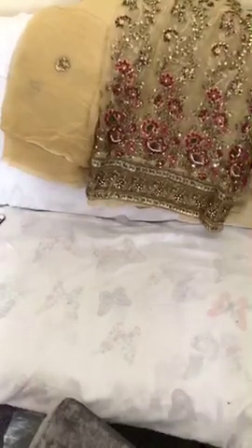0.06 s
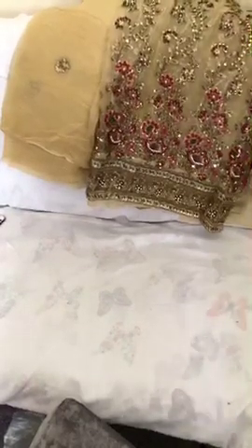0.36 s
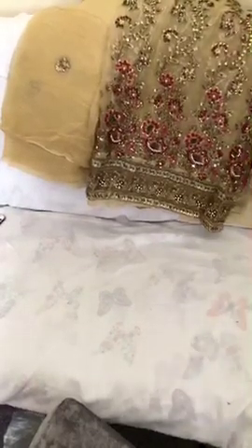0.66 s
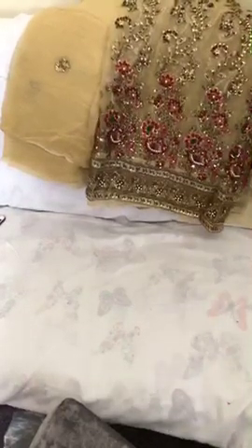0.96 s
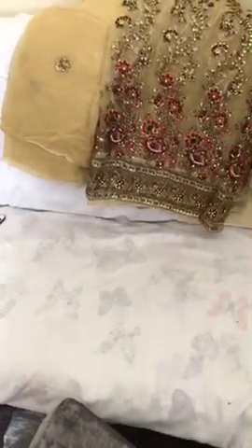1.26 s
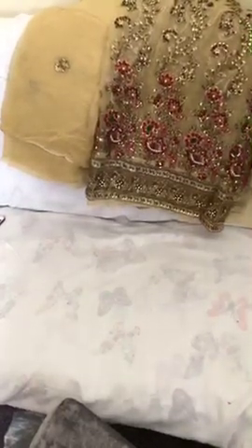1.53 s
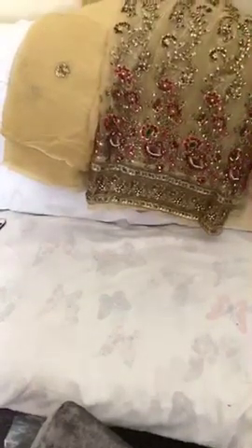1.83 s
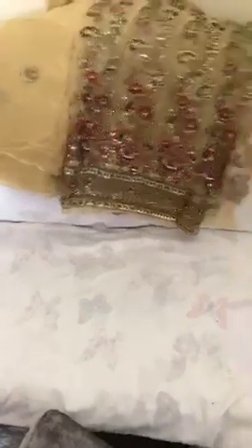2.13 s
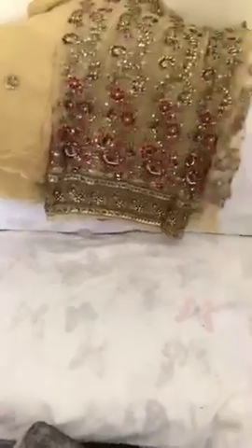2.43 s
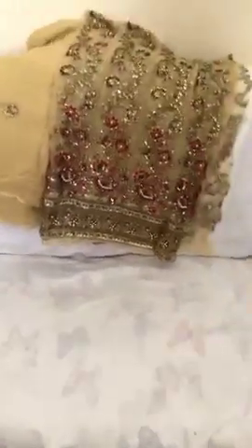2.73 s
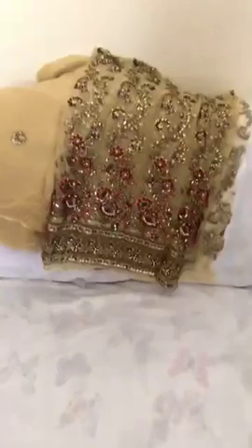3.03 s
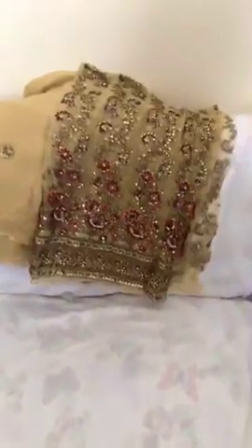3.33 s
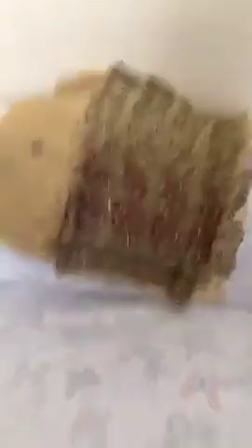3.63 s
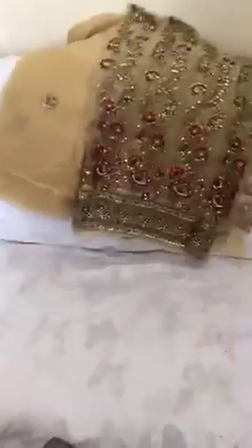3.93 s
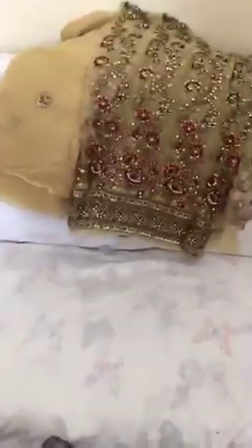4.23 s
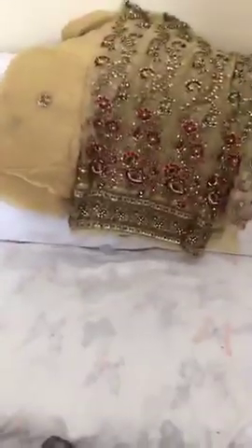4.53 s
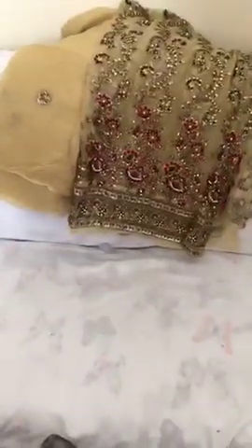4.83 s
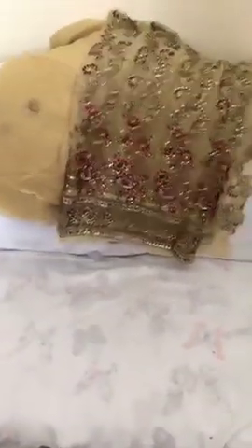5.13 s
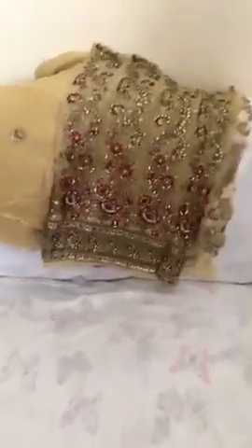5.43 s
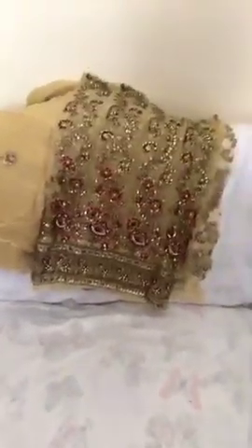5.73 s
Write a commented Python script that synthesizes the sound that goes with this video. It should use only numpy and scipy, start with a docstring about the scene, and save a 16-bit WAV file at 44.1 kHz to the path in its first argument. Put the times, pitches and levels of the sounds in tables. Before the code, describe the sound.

Stiff beaded fabric crinkles and rustles as it is pulled over a bed, dying away into scattered clicks and soft bumps.

```python
"""A small bedroom, a hand-held microphone near the bed. A stiff, bead-embroidered garment is dragged
over the sheet and spread out. One pull that dies away drives a dense crinkle of catching embroidery
and a soft swish of cloth; as it slows, single beads and creases snap and folds brush past.
Fingers and folds bump dully, and later the fingers slide on the microphone's case.
Behind it all are the room's short tail and a steady hush."""
import sys
import numpy as np
from scipy import signal
from scipy.fft import rfft, irfft, next_fast_len
from scipy.io import wavfile

SR = 44100
rng = np.random.default_rng(int(sys.argv[2]) if len(sys.argv) > 2 else 0)


def dump(signal):
    """Clip the signal to [-1, 1] and save it as 16-bit WAV at the path in sys.argv[1]."""
    limited = np.clip(np.atleast_2d(signal).T, -1, 1)
    pcm = np.round(limited * 32767).astype(np.int16)
    wavfile.write(sys.argv[1], SR, pcm)


N = 263255

FULL_DRAG_DB = -38
REST_S, SETTLE_S = 3.1, 0.21  # the garment lies in place at REST_S, after a short fade

# How hard the garment is pulled over the bed, as the level of its crinkle: time_s, level_db
PULL = [(0.0, -41.5), (0.128, -37.5), (0.41, -38.5), (0.542, -46.5), (0.65, -46), (0.78, -55.5),
        (1.02, -61), (1.12, -55.5), (1.26, -52.5), (1.41, -67), (1.53, -53), (1.74, -71), (1.85, -58.5),
        (1.99, -73), (2.15, -63), (2.29, -73), (2.46, -63), (2.73, -74), (2.86, -73.5), (3.0, -72)]
def pull():
    """One pull that dies away in surges; its level in dB at every sample."""
    return np.interp(np.arange(N) / SR, *np.transpose(PULL))


# Tone of the embroidery at the microphone: frequency_hz, level_db
EMBROIDERY_SPECTRUM = [(290, -46), (500, -3.5), (750, 3), (1100, 0.5), (1700, -2), (2600, -2.5), (4700, -3),
                       (9000, -0.5), (14500, -3), (16000, -13)]
def crinkle(drag_db):
    """Metal thread and beads catch on each other; a slower drag gives fewer catches and less treble."""
    effort_db = drag_db - FULL_DRAG_DB
    catches_per_s = 900 + 4500 * from_db(0.85 * effort_db)
    shared = slips(catches_per_s, spread_db=3, clump_db=4.5)
    coarse = colour(shared + 0.85 * slips(catches_per_s, spread_db=4, clump_db=1.5), EMBROIDERY_SPECTRUM)
    fine = colour(shared + 2 * slips(catches_per_s, spread_db=4, clump_db=3.5), EMBROIDERY_SPECTRUM)
    coarse = rms_one(cut(cut(coarse, 5150, "low", order=4), 860, "high"))
    fine = rms_one(cut(fine, 4870, "high", order=4))
    treble_db = -38.5 + 1.265 * effort_db
    moving = np.clip((drag_db + 75) / 6, 0, 1)  # fades as the cloth comes to a stop
    return moving * (coarse * from_db(drag_db) + fine * from_db(treble_db))


# Tone of cloth on the sheet: frequency_hz, level_db
SWISH_SPECTRUM = [(20, -28), (40, -15), (80, -6), (220, 5.5), (400, 6), (800, 0.5), (1200, -21),
                  (2000, -11), (3000, -71)]
def swish(drag_db):
    """Cloth rubs softly on the sheet, rising and falling with the pull."""
    grains = slips(6000, spread_db=3, clump_db=4.5)
    level_db = -45 + 0.79 * (drag_db - FULL_DRAG_DB)
    return colour(grains, SWISH_SPECTRUM) * from_db(level_db)


# Beads and creases letting go; the metal's glint is relative to the level, slack runs from 0 (taut) to 1:
# start_s, level_db, centre_hz, glint_db, slack
BEAD_SNAPS = [(0.042, -21.5, 3180, -24, 0.64), (0.1148, -25, 6200, 0, 1), (0.1609, -22, 3900, -1, .85),
              (0.2784, -16.5, 3720, -4.5, 0.62), (0.3215, -20.5, 3250, -5, 0.66),
              (0.3695, -22, 7530, -3, 0), (0.4444, -20, 6500, -8, 0.4), (0.6145, -32, 1460, -3, 1),
              (0.6788, -43, 4530, -12, .95), (0.831, -24, 1400, -19, 0.5), (0.8775, -34, 5410, -12, 0),
              (0.9153, -34.5, 4230, -18, 0.99), (0.9607, -31, 5560, -14, .8),
              (0.9648, -28.5, 7800, -12, .05), (1.0133, -31.5, 1200, -26, 0.43),
              (1.0628, -29, 4400, -8, 0.66), (1.0939, -23, 1870, -35, 0.52),
              (1.1355, -32.5, 4100, -10, 0.8), (1.1958, -25.5, 6000, -11, 0), (1.2326, -26.5, 6700, -19, 0),
              (1.281, -30, 2040, -38, .3), (1.3104, -30.5, 3500, -24, 0.6), (1.3709, -34, 5170, -13, 0.64),
              (1.4022, -33, 4080, -30, 0.35), (1.4453, -22, 7800, -10, 0), (1.483, -29, 3420, -6, 0.92),
              (1.4977, -23.5, 3120, -8, 0.3), (1.5291, -28, 1630, -33, 0), (1.5718, -30, 1840, -10, 0.68),
              (1.599, -31.5, 1790, -32, 0.2), (1.6528, -40, 1250, -7, 0.9),
              (1.6728, -31.5, 4500, -35, 0.38), (1.7056, -29.5, 3700, -16, .3),
              (1.71, -25.5, 4070, -22, 0.14), (1.7659, -37.5, 2400, -21, 0.4),
              (1.7849, -27, 3630, -6.5, 0.3), (1.829, -32.5, 3400, -3.5, 0.3),
              (1.8603, -33.5, 2850, 2, 0.74), (1.928, -34.5, 2370, -24, 0.27),
              (1.9988, -40, 1760, -32, 0.2), (2.0413, -41.5, 2020, -14, 0.88),
              (2.1606, -35.5, 2580, -24, 0.6), (2.2468, -47, 2930, -23, 0.6),
              (2.3334, -45.5, 1710, -32, 0.5), (2.4598, -39, 1280, -7, 0.78), (2.588, -39, 1810, -27, 0.66),
              (2.798, -41.5, 3600, -9, 0.64), (2.824, -38, 5200, -2.5, 0.75),
              (2.8985, -41.5, 2260, -13, 0.58), (3.027, -41, 4900, 0, 0.68), (3.086, -38, 6360, -8, 0.61),
              (3.267, -44.5, 4500, 2.5, 0.92), (3.717, -29, 3900, -35, 0.46),
              (4.0583, -45.5, 2000, -15, 0.63), (4.1648, -45, 1850, -9, 0.76),
              (4.7389, -53.5, 2200, -28, 0.94), (5.7636, -46.5, 3220, -45, 0.5),
              (5.7905, -49, 2400, -40, 0.3), (5.9173, -42, 5050, -5, 0.53)]
def snaps(rows):
    """A bead or crease cracks, glints and flaps; returns the direct sound and what enters the room."""
    direct, spread, t = np.zeros(N), np.zeros(N), np.arange(4096) / SR
    click = cut(signal.unit_impulse(len(t)), 590, "high")
    glint_hz = 8800
    for start_s, level_db, centre_hz, glint_db, slack in rows:
        crack_noise, flap_noise = rng.standard_normal((2, len(t)))
        # a slack fold gives way more gradually, flaps more and radiates more than a taut one
        linger_db, flap_db, room_db = -18.5 + 6 * slack, -32.5 + 25 * slack, -14.5 + 18 * slack
        release = np.exp(-np.abs(t - 0.001) / 0.00043)  # a few fibres give first, then the crease goes
        lingering = from_db(linger_db) * np.exp(-t / 0.012)
        burst = np.sign(crack_noise) * (release + lingering)
        crack = resonate(burst, centre_hz, q=2.13) + from_db(-9) * cut(burst, 810, "high")
        crack = peak_one(cut(crack, 7960, "low", order=3))
        glint = from_db(glint_db + 6) * peak_one(cut(burst, glint_hz, "high", order=3))
        flap = flap_noise * (1 - np.exp(-t / 0.00033)) * np.exp(-t / 0.027)
        flap = from_db(flap_db) * peak_one(cut(cut(flap, 1000, "low"), 210, "high"))
        add(direct, start_s, from_db(level_db - 1.46) * (crack + glint + flap))
        # radiated in all directions, the snap keeps only its broad colour
        wide = resonate(click, centre_hz, q=0.78) + from_db(-1.5) * click
        wide = rms_one(cut(wide, 12300, "low")) * crack.std()
        bright = rms_one(cut(click, glint_hz, "high", order=3)) * glint.std()
        add(spread, start_s + 0.001, from_db(level_db + room_db) * wide)
        add(spread, start_s + 0.0031, from_db(level_db + room_db - 11) * bright)
    return direct, spread


def small_snaps(drag_db, count=32):
    """Lesser snaps come by chance and follow the pull's strength; returns rows like BEAD_SNAPS."""
    when, weakness, pitch = rng.random((count, 3)).T
    start_s = when * min(REST_S, N / SR - 1)
    level_db = drag_db[(start_s * SR).astype(int)] + 18 - 6 * weakness
    centre_hz = 3350 * 2 ** (2 * pitch - 1)  # an octave either way
    glint_db, slack = -23, 0.28
    return [(*row, glint_db, slack) for row in zip(start_s, level_db, centre_hz)]


# Short strokes of cloth over cloth on the bed: start_s, length_s, level_db, centre_hz
FOLD_STROKES = [(0.426, 0.043, -41, 3560), (0.592, 0.13, -60, 4600), (0.824, 0.059, -53.5, 1870),
                (1.072, 0.037, -55, 3460), (1.238, 0.03, -53.5, 1260), (1.538, 0.0051, -45.5, 1490),
                (2.327, 0.049, -61, 2300), (2.376, 0.061, -61, 5960), (2.536, 0.035, -62.5, 2000),
                (2.79, 0.0094, -60.5, 5800), (2.94, 0.035, -71.5, 2500), (3.261, 0.044, -65, 4900),
                (3.73, 0.033, -61, 4430), (4.202, 0.029, -71, 1880), (4.94, 0.037, -73, 2200),
                (5.914, 0.03, -65.5, 4630)]
def fold_strokes():
    """A fold brushes past: fine grains in one broad resonance."""
    grains = colour(slips(9000, spread_db=5.5, clump_db=0.5), EMBROIDERY_SPECTRUM)
    out = np.zeros(N)
    for start_s, length_s, level_db, centre_hz in FOLD_STROKES:
        brush = cut(resonate(grains, centre_hz, q=1), 1.56 * centre_hz, "low")
        out += swell(start_s, length_s, level_db) * rms_one(brush)
    return out


# Dull bumps of folds, and of fingers right on the microphone; touch and shudder are relative to the level:
# start_s, level_db, pitch_hz, touch_db, shudder_db
DULL_BUMPS = [(0.178, -42, 230, -15, 2), (0.215, -36, 260, -15, -9), (0.614, -36, 380, -16, -19),
              (0.93, -37.5, 770, -23, -32), (1.101, -44, 370, -20, -32), (1.239, -46, 253, -17, -18),
              (1.516, -42, 520, 2, -23), (1.5309, -40, 366, -11, -15), (1.865, -48, 435, 7, -24),
              (2.043, -49.5, 380, 2, -25), (2.465, -40.5, 398, -15, -12.5), (3.104, -44, 470, -8, -8),
              (3.2322, -37, 324, -31, -13), (3.319, -38.5, 486, -14, -15), (3.345, -39.5, 460, -21, -20),
              (3.756, -41.5, 470, -12, -8), (4.167, -53.5, 475, 1, -18), (5.542, -46, 340, -3.5, -10),
              (5.672, -40.5, 302, -17, -19), (5.686, -41.5, 380, -9, -23), (5.702, -40.5, 288, -9.5, -8.5),
              (5.7917, -40, 338, 1.5, -20)]
def bumps():
    """A contact starts with a muffled tick, rings for a few cycles and leaves a deep shudder."""
    out, t = np.zeros(N), np.arange(8192) / SR
    for start_s, level_db, pitch_hz, touch_db, shudder_db in DULL_BUMPS:
        touch_noise, rattle_noise, shudder_noise = rng.standard_normal((3, len(t)))
        push = (1 - np.exp(-t / 0.0033)) ** 2 * np.exp(-t * pitch_hz / 0.73)
        knock = np.sin(2 * np.pi * pitch_hz * t) * push
        tick = np.sign(touch_noise) * np.exp(-t / 0.0018)
        touch = cut(resonate(tick, 880, q=1.6), 1310, "low", order=4)
        rattle = rattle_noise * np.exp(-t / 0.0098)
        rattle = cut(cut(rattle, 1.61 * pitch_hz, "low", order=4), 190, "high")
        shudder = cut(cut(shudder_noise * np.exp(-t / 0.018), 130, "low"), 47, "high")
        for part, part_db in ((knock, -1.5), (touch, touch_db), (rattle, -9), (shudder, shudder_db)):
            add(out, start_s, from_db(level_db + part_db) * peak_one(part))
    return out


# Handling noise, fingers sliding on the microphone: start_s, length_s, level_db
FINGER_RUBS = [(2.274, 0.46, -68), (3.616, 0.13, -62.5), (3.773, 0.12, -67), (3.901, 0.055, -62),
               (4.26, 0.097, -77), (5.024, 0.16, -65.5), (5.133, 0.31, -70), (5.301, 0.012, -66),
               (5.582, 0.1, -72)]
# Tone of skin on the case: frequency_hz, level_db
SKIN_SPECTRUM = [(40, -15), (150, -4.5), (300, -1.5), (430, 1.5), (650, -14.5), (1200, -18.5),
                 (2200, -29.5), (6000, -35)]
def finger_rubs():
    """Skin drags over the microphone's case in small slips."""
    grains = colour(slips(1500, spread_db=2.5, clump_db=1.5), SKIN_SPECTRUM)
    return grains * sum(swell(*rub) for rub in FINGER_RUBS)


def bedroom(x, t60_s=0.25):
    """The room answers with a short diffuse tail that loses its treble first."""
    t = np.arange(SR // 2) / SR
    noise = rng.standard_normal(len(t)) * (1 - np.exp(-t / 0.00031))
    dull = cut(noise, 3400, "low", order=1)
    treble = noise - dull
    tail = dull * from_db(-60 * t / t60_s) + treble * from_db(-60 * t / (0.72 * t60_s))
    return signal.fftconvolve(x, tail / np.linalg.norm(tail))[:N]


# The quiet bedroom around the microphone: frequency_hz, level_db
HUSH_SPECTRUM = [(15, -55), (40, -4), (70, -8.5), (150, -7.5), (350, -10), (600, -15), (1200, -21.5),
                 (3000, -26.5), (9000, -28.5), (13000, -32), (16000, -40)]
def room_tone():
    """A faint, steady hush, strongest in the bass."""
    return from_db(-69.43) * colour(rng.standard_normal(N), HUSH_SPECTRUM)


def slips(per_s, spread_db, clump_db):
    """Tiny stick-slip releases of uneven size, bunched where a fold gives way."""
    sizes = from_db(spread_db * np.minimum(rng.exponential(1, N), 4))
    released = rng.random(N) < per_s / SR
    signs = rng.choice([-1, 1], N)
    bunching = from_db(clump_db * drift(rate_hz=170))
    return released * sizes * signs * bunching / np.sqrt(per_s)


def drift(rate_hz):
    """A random wander with a spread of about 1."""
    knots = rng.standard_normal(8192)
    return np.interp(np.arange(N) / SR * rate_hz, np.arange(len(knots)), knots)


def swell(start_s, length_s, level_db):
    """The gain of one stroke: it swells and fades."""
    phase = np.clip((np.arange(N) / SR - start_s) / length_s, 0, 1)
    return from_db(level_db) * np.sqrt(2 * np.abs(np.sin(np.pi * phase))) * (phase < 1)


def colour(x, spectrum):
    """Give a steady texture a spectrum; rms 1."""
    hz, db = np.transpose(spectrum)
    size = next_fast_len(N)
    bins_hz = np.maximum(np.fft.rfftfreq(size, 1 / SR), 1)
    gain = from_db(np.interp(np.log(bins_hz), np.log(hz), db))
    return rms_one(irfft(rfft(x, size) * gain, size)[:N])


def resonate(x, hz, q):
    """A damped resonance with gain 1 at its centre."""
    return signal.lfilter(*signal.iirpeak(min(hz, .36 * SR), max(q, 1 / 2, 5 * hz / SR), fs=SR), x)


def cut(x, hz, kind, order=2):
    """Butterworth low- or high-pass."""
    return signal.sosfilt(signal.butter(order, min(hz, .45 * SR), kind, fs=SR, output="sos"), x)


def add(out, start_s, sound):
    """Mix a short sound in at start_s."""
    start = max(int(start_s * SR), 0)
    out[start:start + len(sound)] += sound[:N - start]


def from_db(db):
    """Decibels to gain."""
    return 10 ** (np.asarray(db) / 20)


def rms_one(x):
    """Scale to an rms of 1."""
    return x / np.sqrt(np.mean(x ** 2) + 1e-20)


def peak_one(x):
    """Scale to a peak of 1."""
    return x / np.abs(x).max()


def scene():
    """In mono: the garment near by with the room behind it, dry handling noise and a steady hush."""
    drag_db = pull()
    sliding = crinkle(drag_db) + swish(drag_db)
    settling = np.clip((REST_S - np.arange(N) / SR) / SETTLE_S, 0, 1)
    cloth = from_db(-0.33) * (settling * sliding + fold_strokes())
    direct, spread = snaps(BEAD_SNAPS + small_snaps(drag_db))
    room = bedroom(from_db(-11) * cloth + from_db(-1.5) * spread)
    hush = room_tone()
    return (cloth + direct + room + finger_rubs() + bumps() + hush)[None]


def record(dry):
    """The top of the microphone's signal is cut steeply."""
    cutoff_hz = 16100
    return signal.sosfilt(signal.ellip(10, .1, 70, cutoff_hz, fs=SR, output="sos"), dry)


dry = scene()
out = record(dry)
dump(out)
```